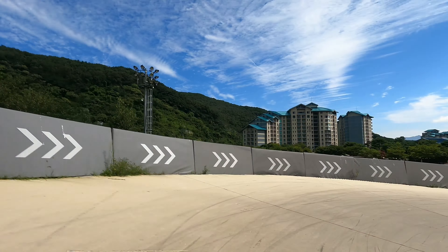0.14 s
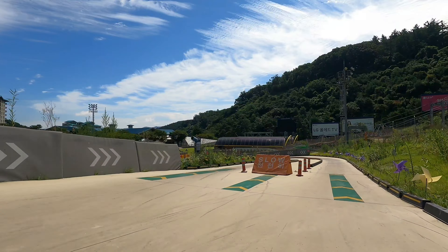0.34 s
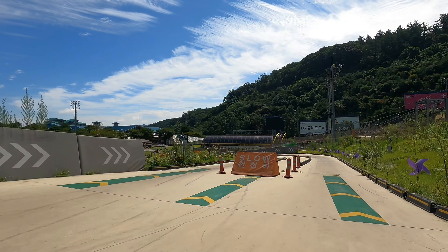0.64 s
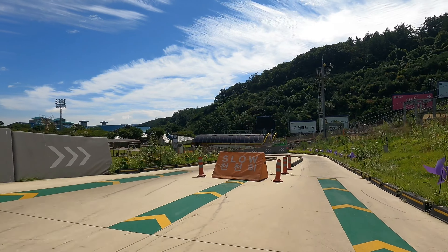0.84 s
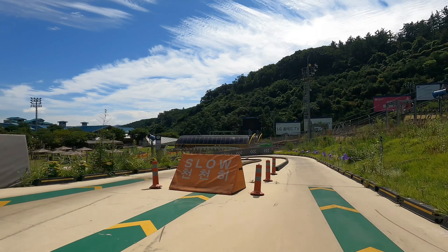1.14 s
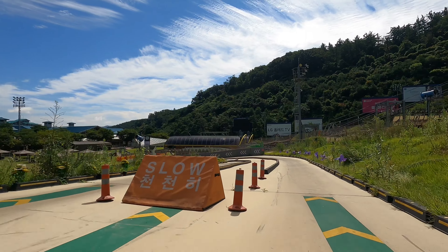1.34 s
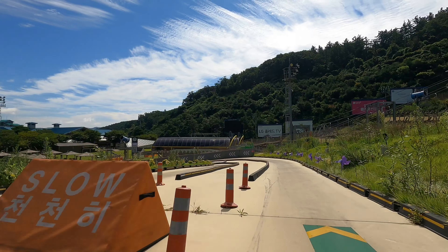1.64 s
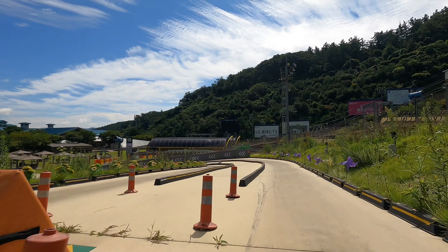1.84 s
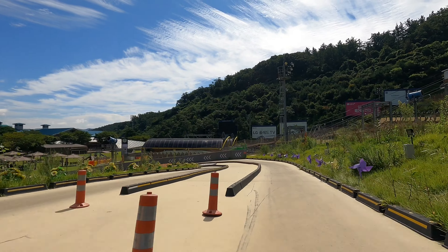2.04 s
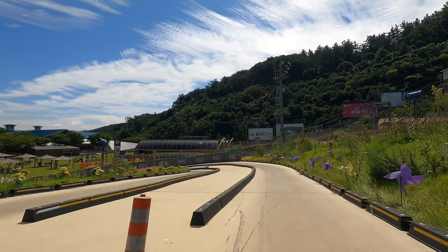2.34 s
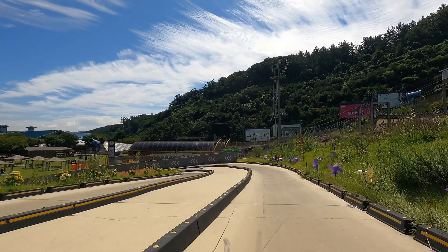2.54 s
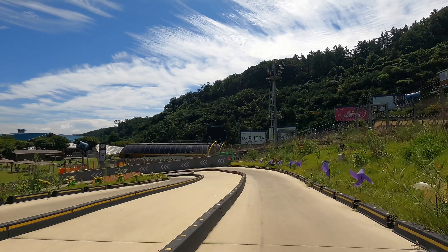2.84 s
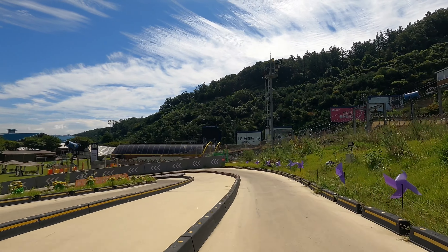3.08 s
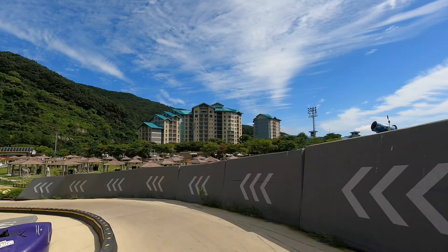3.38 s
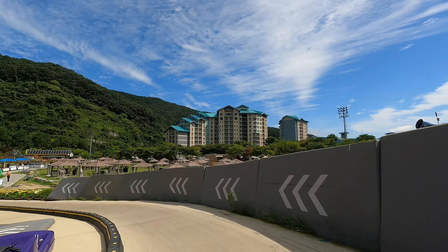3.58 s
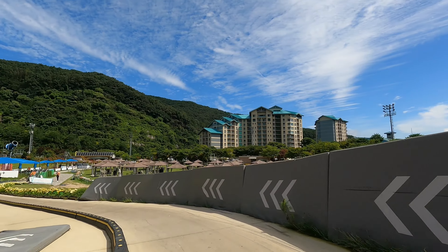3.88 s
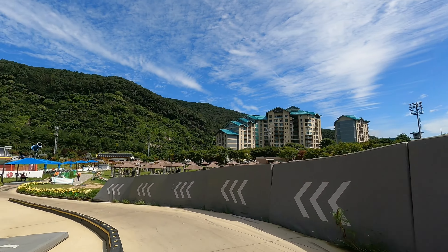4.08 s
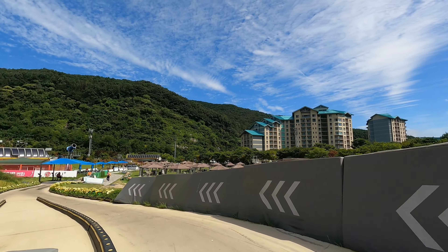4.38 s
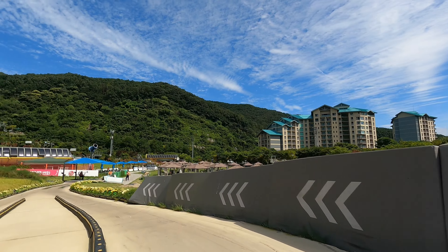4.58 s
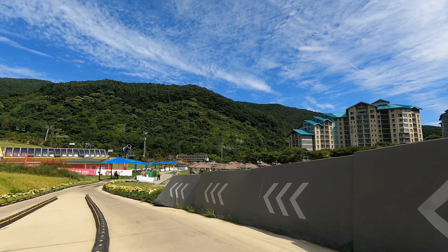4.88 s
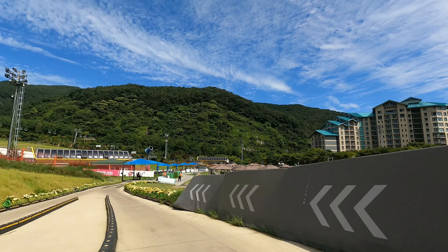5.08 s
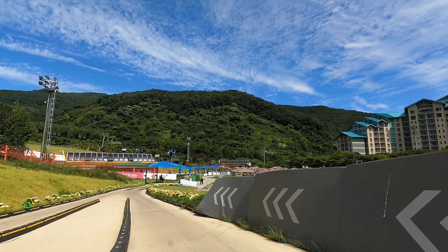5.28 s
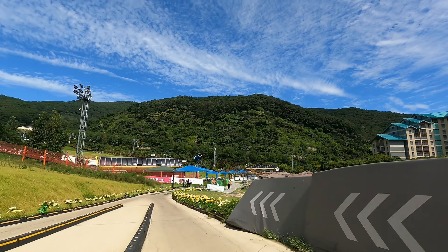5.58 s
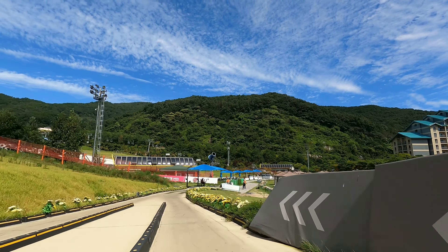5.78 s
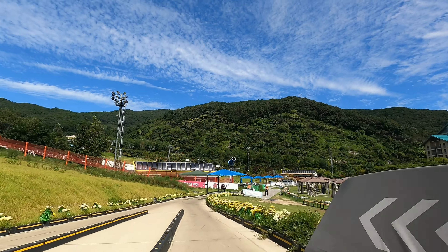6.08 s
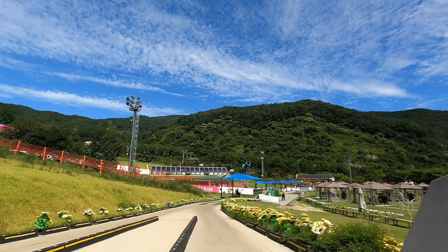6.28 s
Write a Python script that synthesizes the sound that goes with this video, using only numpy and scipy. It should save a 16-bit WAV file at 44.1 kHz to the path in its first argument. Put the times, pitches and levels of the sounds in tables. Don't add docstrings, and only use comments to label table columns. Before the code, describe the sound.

Steady, rough, boomy rumble of a downhill cart on concrete, with a clattering loose part, brief faint squeaks and a tiny dropout near the start.

```python
import sys
import numpy as np
from scipy import signal
from scipy.io import wavfile
from scipy.ndimage import uniform_filter1d, minimum_filter1d

SR = 44100
rng = np.random.default_rng(int(sys.argv[2]) if len(sys.argv) > 2 else 0)


def to_linear_factor(level_db):
    exponent = np.asarray(level_db, float) / 20
    return 10 ** exponent


def waveform_to_disk(signal):
    frames = np.transpose(np.atleast_2d(signal))
    scaled = np.clip(frames, -1, 1) * 32767
    samples = np.round(scaled).astype(np.int16)
    wavfile.write(sys.argv[1], SR, samples)


N = 283122

# time in seconds, level in dB, shift of the load from floor pan to
# side wall in dB, coarseness of the road in dB.
SHAKING = [(0, -16, 1.5, -5), (.4, -16.5, -2, -0.5), (.7, -14.5, 2, -0.5), (1.1, -13.5, 0, 1.5),
           (1.5, -14, -1.5, 1), (1.9, -15, 1, -1.5), (2.25, -13.5, -0.5, 1), (2.6, -15, -0.5, 2.5),
           (3.1, -15, 1, 2), (3.6, -14, 1, 2), (3.95, -14.5, 3.5, 0.5), (4.3, -15.5, 2, 1.5),
           (4.65, -13.5, -1.5, 1), (5.0, -13, 0, -1), (5.35, -16.5, 1.5, 0), (5.6, -13.5, -1.5, 2.5),
           (6.0, -15, 2, 1), (6.42, -14, 2.5, 2)]
# time in seconds, peak in dB, upper panels against the peak in dB.
JOLTS = [(0.039, -33, -5), (0.224, -30.5, -1), (0.402, -38.5, 3), (0.587, -33.5, -5), (0.862, -29, -4),
         (1.064, -33, -14), (1.263, -31, 2), (1.394, -27.5, -4), (1.533, -26.5, -3.5), (2.349, -30, -15),
         (2.475, -33, 1), (2.567, -31, -12), (2.806, -30.5, -6), (3.107, -31, 2), (0.097, -39, -13),
         (0.356, -39, 5), (0.515, -32, -5), (1.107, -39, -12), (1.204, -40, -2), (1.73, -33, -5),
         (2.061, -35, -14.5), (2.222, -40, -10), (2.413, -31.5, -14), (2.518, -27, -14), (2.584, -24, -18),
         (2.712, -29.5, -6), (2.846, -35, -14), (3.005, -42, 6), (3.253, -38, -7), (3.655, -34, -17),
         (3.807, -27, -21), (3.85, -31, -17), (3.891, -28.5, -22), (3.931, -32.5, -17), (3.975, -42, -11),
         (4.053, -28.5, -20.5), (4.301, -34, -20), (4.747, -33, -10), (4.875, -33.5, -15),
         (4.912, -32, -19), (5.343, -31, -17), (5.575, -32, -18), (5.937, -32, -14), (6.053, -27.5, -21),
         (3.635, -27.5, -8), (3.723, -30, -27), (4.113, -29.5, -17), (4.193, -21.5, -15.5),
         (4.374, -30, -18), (4.457, -28, -17), (4.62, -34, -3.5), (4.704, -30, -10), (4.83, -29.5, -14),
         (5.044, -25, -7), (5.127, -27.5, -8.5), (5.539, -29, -27), (5.773, -29, -24), (5.892, -33, -22),
         (6.237, -32, -15), (6.385, -27.5, -7)]
# time in seconds, half turns of the wheel so far.
ROLLED = [(0.036, 0), (0.356, 10), (0.4568, 14), (1.336, 40), (3.593, 109), (3.64, 111), (3.975, 119),
          (4.196, 124), (5.045, 144), (5.539, 156), (6.014, 168), (6.385, 178)]


def curve(rows):
    s, *columns = np.transpose(rows)
    return [np.interp(np.arange(N) / SR, s, c) for c in columns]


def unit(x):
    return x / np.sqrt(np.mean(x ** 2) + 1e-20)


def drift(rate_hz):
    r = np.exp(-80 * np.pi * rate_hz / SR)
    noise = rng.standard_normal(N // 40 + 2002)
    slow = signal.lfilter([1], [1, -2 * r, r * r], noise)[2000:]
    return np.interp(np.arange(N) / 40, np.arange(len(slow)), unit(slow))


def resonate(x, hz, width_hz):
    r = np.exp(-np.pi * width_hz / SR)
    zeros = np.array([1, 0, -1]) * (1 - r * r) / 2
    return signal.lfilter(zeros, [1, -2 * r * np.cos(2 * np.pi * hz / SR), r * r], x)


def half_turns(taken):
    s, turns = np.transpose(ROLLED)
    at = np.interp(np.arange(turns[-1] + 1), turns, s)
    at = at + .002 * rng.standard_normal(len(at))
    return at, np.abs(at[:, None] - taken).min(axis=1) > .013


def throb():
    lag = 0.2
    return np.cos(2 * np.pi * (curve(ROLLED)[0] - lag))


def axle():
    # start in seconds, length in seconds, level in dB.
    squeaks = [
        (2.03, 0.039, -72),
        (2.512, .025, -60),
        (2.54, .015, -61),
        (2.575, .016, -61),
        (2.6, .015, -65),
        (3.82, 0.039, -61),
        (3.885, .05, -62),
        (5.899, .04, -67),
        (6.03, 0.071, -68),
    ]
    squeak_hz = 7350
    t = np.arange(N) / SR
    shape = sum(to_linear_factor(db) * np.sin(np.pi * np.clip((t - s) / length, 0, 1)) for s, length, db in squeaks)
    noise = rng.standard_normal(N)
    return shape * unit(resonate(resonate(noise, squeak_hz, 60), squeak_hz, 90))


def gliding_whistles(rubs, glide_hz, bend, rough):
    t = np.arange(N) / SR
    waver, wobble = to_linear_factor(3 * rough * drift(120)), rough * drift(200)
    out = np.zeros(N)
    for s, db, length_s, from_hz in rubs:
        done = np.clip((t - s) / length_s, 0, 1)
        cycles = length_s * (from_hz * done + glide_hz * done ** (bend + 1) / (bend + 1))
        out += to_linear_factor(db + 2) * np.sin(np.pi * done) ** .6 * np.sin(2 * np.pi * cycles + wobble)
    return out * waver


def wheel_rub():
    # start in seconds, level in dB, length in seconds, first pitch in Hz.
    chirps = [
        (1.312, -54, .035, 4050),
        (1.462, -55, .035, 4000),
        (1.524, -54, .04, 4150),
        (1.592, -54, .045, 4120),
        (1.666, -52, .04, 4220),
        (1.732, -53, .05, 4120),
        (1.805, -55, .04, 4150),
        (1.875, -56, .04, 4150),
        (2.19, -58, .035, 4200),
        (2.255, -57, .035, 4120),
    ]
    return gliding_whistles(chirps, glide_hz=-380, bend=1.6, rough=.8)


def tyre_scuff():
    # start in seconds, level in dB, length in seconds, first pitch in Hz.
    scuffs = [
        (.135, -49, .055, 1000),
        (.268, -55, .04, 950),
        (3.098, -39, .05, 1000),
        (.505, -47, .04, 1100),
    ]
    return gliding_whistles(scuffs, glide_hz=700, bend=.8, rough=.85)


def shaken():
    at, db, _ = np.transpose(JOLTS)
    blows, t = np.zeros(N), np.arange(SR // 8) / SR / 0.016
    blows[np.round((at - .008) * SR).astype(int)] = to_linear_factor(db + 19.5)
    return 1 + signal.fftconvolve(blows, np.e * t * np.exp(-t))[:N]


def tyres(flutter_db):
    # time in seconds, level in dB, brightness in dB per octave.
    hiss = [(0.0, -48, 4), (0.25, -54, 8), (0.43, -43.5, 3), (0.8, -48, 7), (1.07, -45, 3.5),
            (1.38, -47, 5), (1.88, -43.5, 4), (2.16, -42.5, 4), (2.61, -42.5, 1.5), (2.84, -49.5, 4),
            (3.09, -42, 3), (3.27, -48, 7.5), (4.13, -48.5, 5.5), (5.42, -52, 6), (5.58, -48, 4.5),
            (6.2, -46.5, 3), (6.42, -50.5, 7)]
    # frequency in Hz, density in dB per Hz.
    colour_rows = [(470, -31), (800, -8.5), (1260, -1.5), (1730, -22.5), (2780, -18), (3370, -26.5),
                   (4950, -27), (5610, -35.5), (6610, -35.5), (8020, -37.5), (10400, -70), (17600, -120)]
    level_db, tilt_db = curve(hiss)
    hz, db = np.transpose(colour_rows)
    white, out = rng.standard_normal((2, N)), np.zeros(N)
    edges = 750 * 2 ** (np.arange(12) / 3)
    for k, (low, high) in enumerate(zip(edges, edges[1:])):
        band = signal.sosfilt(signal.butter(2, [low, high], "band", fs=SR, output="sos"), white[k % 2])
        mid = np.sqrt(low * high)
        colour = np.interp(np.log(mid), np.log(hz), db) + tilt_db * np.log2(mid / 2500) - 6 * (mid < 1500)
        out += band * to_linear_factor(colour + flutter_db * drift(19))
    bright = signal.sosfilt(signal.butter(4, 1000, "high", fs=SR, output="sos"), out)
    return to_linear_factor(level_db - 7.0) * out / np.std(bright)


def knocks():
    # time in seconds, peak in dB, dull modes in dB.
    hard_rows = [(1.3654, -29, -31), (1.427, -24.5, -26.5), (1.531, -25.5, -31), (1.561, -21.5, -31),
                 (1.697, -16.5, -24.5), (1.761, -25, -27), (1.829, -18.5, -24.5), (1.996, -23, -30),
                 (2.024, -14.5, -23), (2.1566, -23, -29), (2.2217, -19.5, -26.5), (2.353, -25, -33),
                 (2.3847, -18.5, -24), (2.418, -21, -28), (2.478, -18, -23), (2.495, -18.5, -50),
                 (2.514, -16.5, -22.5), (2.549, -12, -21.5), (2.5626, -16.5, -47), (2.6134, -28, -33),
                 (2.679, -23, -26), (2.743, -20.5, -25.5), (2.807, -17, -26), (3.136, -21, -26),
                 (3.302, -23.5, -31), (3.3305, -17, -24), (3.362, -16, -22.5), (3.396, -20, -27),
                 (3.462, -20, -26.5), (3.591, -23, -28)]
    # time in seconds, bright modes in dB, dull modes in dB.
    ticks = [(1.3982, -46, -36), (1.4494, -32.5, -55), (1.4594, -44, -56), (1.4894, -38, -44),
             (1.5794, -43, -51), (1.6317, -38, -38), (1.667, -34, -38), (1.7345, -38.5, -44),
             (1.7993, -40, -44), (1.864, -32.5, -41), (1.8971, -32, -37), (1.9294, -39, -40.5),
             (1.9624, -31.5, -36), (2.059, -28.5, -40), (2.0905, -29, -39), (2.1221, -34, -43.5),
             (2.1894, -30.5, -36), (2.2494, -41, -56), (2.2894, -44, -45), (2.3241, -31.5, -39),
             (2.4494, -43, -51), (2.6094, -36, -46), (2.6494, -31, -43), (2.7137, -35, -44.5),
             (2.7794, -35, -49), (2.8444, -43, -50), (3.4294, -33, -38), (3.4974, -37, -46),
             (3.529, -33, -39.5), (3.561, -35, -43)]
    # time in seconds, peak in dB, dull modes in dB, top modes against the peak in dB.
    strays = [(0.223, -30.5, -33, -26.5), (0.4027, -41, -50, -13), (0.4568, -26.5, -48, -24),
              (0.521, -28.5, -32, -23), (0.796, -39, -35.5, -15), (0.355, -35, -45, -21),
              (0.037, -37, -33, -22), (0.14, -33, -43.5, -22), (0.293, -31, -37, -20),
              (0.61, -31, -40, -23), (4.64, -30.5, -35, -21.5), (4.975, -31, -45, -19.5),
              (5.575, -42, -43, -6), (5.733, -45, -53, -1), (2.744, -55, -56, 5), (0.928, -33, -35, -12),
              (1.014, -28, -39, -19), (1.064, -41, -26, -29), (2.908, -33, -32.5, -23),
              (2.94, -24.5, -33.5, -31), (3.072, -32, -32, -24), (3.167, -24.5, -46, -15),
              (3.248, -25, -36, -24), (3.7238, -29, -45, -22), (3.765, -38, -33, -28),
              (3.8067, -42, -34, -11), (4.196, -37, -30, -12), (4.7075, -38, -37, -5),
              (4.8304, -26, -33, -14), (4.923, -26, -38, -21), (5.645, -37, -35.5, -15),
              (5.045, -24, -25, -25), (5.055, -36, -35, -27), (5.068, -39, -43, -26), (5.08, -41, -45, -20),
              (2.58, -28, -27, -23), (2.567, -23, -38, -14), (5.1272, -57, -41, -31),
              (5.54, -40, -41.5, -3.5), (5.6912, -48, -56.5, 3.5), (5.7722, -30, -29.5, -30),
              (5.891, -28, -35, -21), (6.0172, -28.5, -47, -31), (6.074, -30.5, -64, -20)]
    # time in seconds, peak in dB.
    rattle = [(0, -51), (.9, -43), (1.35, -39), (1.7, -28), (1.86, -27), (1.93, -32), (2.07, -25.5),
              (2.2, -28.5), (2.27, -36), (2.4, -32), (2.7, -25.5), (2.85, -45), (3.2, -42), (3.5, -37),
              (3.59, -41), (3.63, -50.5), (5.3, -57.5), (6.42, -40)]
    top_db = -23
    hard = [(s, db, dull, top_db) for s, db, dull in hard_rows]
    light = [(s, db + 6.5, dull + 8.5, top_db) for s, db, dull in ticks]
    listed = np.vstack([hard, light, strays])
    at, free = half_turns(listed[:, 0])
    luck = np.clip(rng.standard_normal((len(at), 3)), -2, 1.5)
    peak = np.interp(at, *np.transpose(rattle)) + 5.5 * luck[:, 0]
    dull = -33 + (peak + 30) + 1.8 * luck[:, 1]
    regular = np.transpose([at, peak, dull, top_db + 4.5 * luck[:, 2]])
    return np.vstack([listed, regular[free]])


def flurries(at, db, rise_s, chatter_s):
    blows, t = np.zeros(N), np.arange(SR // 10) / SR
    blows[np.round((at - .0015) * SR).astype(int)] = to_linear_factor(db)
    fall = np.exp(-t / chatter_s) + 0.2 * np.exp(-t / (4.5 * chatter_s))
    return signal.fftconvolve(blows, 1.54 * (1 - np.exp(-t / rise_s)) ** 2 * fall)[:N]


def loose_part(rise_s, chatter_s):
    # frequency in Hz, level in dB, t60 in seconds.
    thud = [(1300, -3, .008), (1590, 2, .01), (1700, 1, .009), (1860, -6, .006), (2150, 2, .015),
            (2330, -2, .007), (2500, -5, .006)]
    # frequency in Hz, level in dB, t60 in seconds.
    bright = [(2700, 0, 0.004), (3050, 2, 0.005), (3400, 1, 0.004), (4100, -6, 0.009), (4860, -7, 0.003)]
    # frequency in Hz, level in dB, t60 in seconds.
    top = [(5050, -3.5, 0.005), (5780, -5, 0.0072), (6470, -8, 0.0085), (7570, -9.5, 0.0062),
           (7800, -6, 0.0039), (9600, -8, .002)]
    at, peak_db, dull_db, top_db = knocks().T
    contacts = rng.standard_normal((2, N))
    luck, out = rng.standard_normal((len(at), 15)), np.zeros(N)
    groups = [(thud, dull_db - 24.5, 3200), (bright, peak_db - 28.5, 5600), (top, peak_db + top_db - 15.5, 12000)]
    k = 0
    for modes, blow_db, contact_hz in groups:
        rung = np.zeros(N)
        for hz, db, t60 in modes:
            strength_db = blow_db + db - 2 + 1.5 * luck[:, k % 15]
            force = flurries(at, strength_db, rise_s, chatter_s) * contacts[k % 2]
            r, w = to_linear_factor(-60 / (t60 * SR)), 2 * np.pi * hz / SR
            rung += signal.lfilter([0, np.sin(w)], [1, -2 * r * np.cos(w), r * r], force + 1e-18)
            k += 1
        out += signal.sosfilt(signal.butter(4, contact_hz, fs=SR, output="sos"), rung)
    return out


def jolt_rows():
    at, free = half_turns(np.array(JOLTS)[:, 0])
    luck = np.clip(rng.standard_normal((len(at), 2)), -2, 1.5)
    coarse = np.interp(at, *np.transpose(SHAKING)[[0, -1]])
    uneven = 3 * (-1) ** np.arange(len(at))
    peak = -40 + coarse + uneven + 2.5 * luck[:, 0]
    light = np.transpose([at, peak, -18 + 2.6 * luck[:, 1]])
    return np.vstack([JOLTS, light[free]])


def ridges(rise_s, fall_s):
    out, t, rows = np.zeros(N + SR), np.arange(SR // 10) / SR, jolt_rows()
    envelope = (1 - np.exp(-t / rise_s)) ** 2 * np.exp(-t / fall_s)
    jolts = rng.standard_normal((len(rows), len(t))) * envelope
    lower = signal.sosfilt(signal.butter(3, [560, 1100], "band", fs=SR, output="sos"), jolts)
    upper = signal.sosfilt(signal.butter(4, [950, 1600], "band", fs=SR, output="sos"), jolts[::-1])
    lead_s = .003
    for (s, db, upper_db), low, high in zip(rows, lower, upper):
        jolt = unit(low) + to_linear_factor(upper_db - 2) * unit(high)
        out[round((s - lead_s) * SR):][:len(t)] += to_linear_factor(db - 12) * jolt
    return out[:N]


def booms():
    # time in seconds, peak in dB.
    strikes = [(0.139, -21.5), (0.229, -20), (0.428, -28), (0.522, -11.5), (0.658, -22), (0.726, -27),
               (0.796, -21), (0.866, -18), (1.132, -28), (1.199, -25), (1.269, -23), (1.298, -32),
               (1.339, -25), (1.396, -15), (1.43, -18), (1.6, -16), (1.694, -21), (1.825, -18),
               (2.272, -25), (2.353, -21), (2.392, -15), (2.459, -23), (2.519, -17), (2.568, -12),
               (2.646, -16), (2.78, -16.5), (2.872, -16), (3.001, -30), (3.143, -14.5), (3.171, -15),
               (3.236, -13.5), (3.328, -14), (3.559, -26), (3.599, -18), (3.723, -17), (3.772, -21),
               (3.851, -18), (3.931, -15.5), (3.976, -21), (4.022, -18), (4.113, -17), (4.142, -17),
               (4.194, -8), (4.368, -15), (4.444, -12.5), (4.701, -18), (4.757, -15), (4.829, -16),
               (4.998, -32), (5.044, -9), (5.134, -8.5), (5.245, -17), (5.57, -17), (5.605, -17),
               (5.78, -10.5), (5.861, -7.5), (5.899, -16), (5.976, -14.5), (6.311, -22), (6.338, -12.5)]
    # frequency in Hz, level in dB, t60 in seconds.
    plate_modes = [(409.2, -1.5, .07), (444.7, 1, 0.064), (526, -2.5, 0.081), (593, -10, 0.1)]
    at, db = np.transpose(strikes)
    luck, out = rng.standard_normal((len(at), 8)), np.zeros(N)
    push = np.hanning(int(.004 * SR) + 3)
    for k, (hz, mode_db, t60) in enumerate(plate_modes):
        blows = np.zeros(N, complex)
        strength = to_linear_factor(db - 6 + mode_db + 2 * luck[:, k])
        blows[np.round(at * SR).astype(int)] = strength * np.exp(1j * luck[:, 4 + k])
        pushed = signal.fftconvolve(blows, push / push.sum())[:N] + 1e-18
        rung = signal.lfilter([1], [1, -to_linear_factor(-60 / (t60 * SR))], pushed)
        out += np.real(rung * np.exp(2j * np.pi * hz * np.arange(N) / SR))
    return out


def humps():
    # time in seconds, peak in dB, floor pan swell in dB, side wall swell in dB.
    hump_rows = [(0.129, -7, 1.5, -0.5), (0.427, -3, -1, -0.5), (0.67, -11, -1, 0),
                 (1.113, -5.5, -1.5, -0.5), (1.43, -5.5, -1, -1), (1.877, -6, 2, -0.5),
                 (2.085, -7.5, -0.5, 1), (2.411, -6, 0.5, 1.5), (2.685, -6.5, 0, 1), (2.904, -8.5, 1, 0),
                 (3.075, -11, 3.5, -2.5), (3.272, -10, -3.5, 0.5), (3.531, -9, 2, -0.5),
                 (3.725, -8.5, 0, 0), (3.931, -4, 1.5, -0.5), (4.146, -5.5, 3, 1.5), (4.328, -10.5, 1, -1),
                 (4.563, -8, 0, 0.5), (4.742, -12.5, 1, -2.5), (4.927, -4.5, 1.5, -0.5),
                 (5.3, -11.5, 4.5, -0.5), (5.507, -3.5, 0.5, 2), (5.785, -2.5, -1, -1.5),
                 (6.113, -9.5, 2.5, -0.5)]
    hump_s = 0.032
    s, peak, pan, wall = np.transpose(hump_rows)
    coarse_n = np.arange(0, N, 64)
    shape = np.exp(-((coarse_n[:, None] / SR - s - hump_s / 2) / hump_s) ** 2)
    shared = 0.26 * (peak - peak.mean())
    return [np.interp(np.arange(N), coarse_n, shape @ (shared + own)) for own in (pan, wall)]


def shell_group(modes, level_db, evening, window_s):
    road = rng.standard_normal((len(modes), N + SR // 4))
    hum = np.zeros(N + SR // 4)
    for grain, (hz, width, db) in zip(road, modes):
        rung = resonate(resonate(grain, hz, width), hz, 4 * width)
        hum += to_linear_factor(db) * unit(rung) * np.sqrt(width)
    window = int(window_s * SR)
    swell = uniform_filter1d(uniform_filter1d(unit(hum) ** 2, window), window)
    return to_linear_factor(level_db) * unit((hum / (swell + .02) ** (evening / 2))[SR // 4:])


def leaning_wall():
    # frequency in Hz, width in Hz, level in dB.
    wall_mode = [(256.4, 12, 0)]
    # time in seconds, level in dB.
    lean = [
        (0, -44.5),
        (1.9, -33),
        (2.1, -25),
        (2.4, -36),
        (3.75, -36),
        (3.9, -22.5),
        (4.3, -22),
        (4.45, -37),
        (6.42, -36.5),
    ]
    return shell_group(wall_mode, curve(lean)[0], evening=0.55, window_s=0.034)


def shell():
    # frequency in Hz, width in Hz, level in dB.
    sway = [(28.7, 5, 3.5), (44.4, 34, 3.5), (75.4, 14, -17.5)]
    # frequency in Hz, width in Hz, level in dB.
    floor_pan = [(124.3, 14.8, -2), (138.44, 7.65, 1), (165.9, 14.8, -2)]
    # frequency in Hz, width in Hz, level in dB.
    side_wall = [(208.4, 34.3, 2), (255.8, 19.6, 3), (305, 17.4, -3.5), (334, 42.8, -5)]
    # frequency in Hz, width in Hz, level in dB.
    panels = [(397, 20, -1.5), (452.4, 46, 5), (564, 71, -6.5), (584, 66, -13.5), (734.5, 89, -10),
              (1060, 450, -27)]
    # time in seconds, level in dB.
    sway_load = [(0, 2.5), (.8, 1.5), (1.5, 1.5), (3.2, 0), (3.7, -1), (4.2, -0.5), (4.8, -3.5), (5.3, 0),
                 (6.42, 2)]
    level, shift, coarse = curve(SHAKING)
    mean = level.mean()
    pan_swell, wall_swell = humps()
    sway_db = mean + 0.81 * (level - mean) - 10.5 + curve(sway_load)[0] - 0.8 * coarse + 3.0 * drift(41.0)
    pan_db = level - 3.5 - shift + pan_swell + 1.2 * drift(1.2)
    wall_db = level - 4.5 + shift + wall_swell + 0.92 * drift(7.8)
    panel_db = mean + 0.94 * (level - mean) - 15 + coarse + 1.5 * throb() + 1.1 * drift(50)
    return (shell_group(sway, sway_db, evening=0.15, window_s=0.099)
            + shell_group(floor_pan, pan_db, evening=0.89, window_s=0.079)
            + shell_group(side_wall, wall_db, evening=0.39, window_s=0.0099)
            + shell_group(panels, panel_db, evening=0.042, window_s=0.06))


def scene():
    squeals = axle() + wheel_rub() + tyre_scuff()
    hiss = shaken() * tyres(flutter_db=2.0)
    blows = loose_part(rise_s=.0028, chatter_s=.0052) + ridges(rise_s=.0015, fall_s=.016) + booms()
    return (squeals + hiss + blows + leaning_wall() + shell())[None]


def limiter(x, top):
    span = SR // 200
    needed = minimum_filter1d(np.minimum(1, top / (np.abs(x) + 1e-9)), 2 * span)
    return x * uniform_filter1d(uniform_filter1d(needed, span), span)


def microphone(x):
    sloped = signal.sosfilt(signal.butter(4, 9300, fs=SR, output="sos"), x)
    limited = signal.sosfiltfilt(signal.butter(12, 7700, fs=SR, output="sos"), sloped)
    return limited + to_linear_factor(-8.5) * (sloped - limited) + to_linear_factor(-94) * rng.standard_normal(N)


def low_pass(x):
    return signal.sosfilt(signal.butter(12, 15750, fs=SR, output="sos"), x)


def record(dry):
    x, n = microphone(limiter(dry, top=.71)), np.arange(N)
    stop, resume, join = (round(s * SR) for s in (.41507, .43084, 3.59751))
    x = x - (x[:, [stop]] + .012) * np.exp(-np.abs(n - stop) / (0.0033 * SR))
    x = x + (.4 - x[:, [resume]]) * np.exp(-((n - resume) / (0.0023 * SR)) ** 2)
    x = x * np.where(n < stop, 1, np.clip((n - resume + 1) / 2, 0, 1))
    x = x - .055 * (n >= join) * np.exp(-np.abs(n - join) / (.002 * SR))
    x = x * (1 - .85 * np.exp(-(n / (.003 * SR)) ** 2))
    x = x - (x[:, [-1]] + .06) * np.exp((n - N) / (.003 * SR))
    return low_pass(x)


dry = scene()
out = record(dry)
waveform_to_disk(out)
```